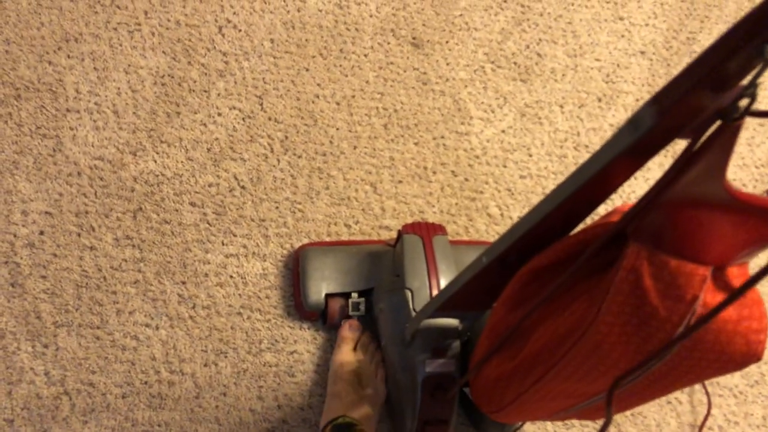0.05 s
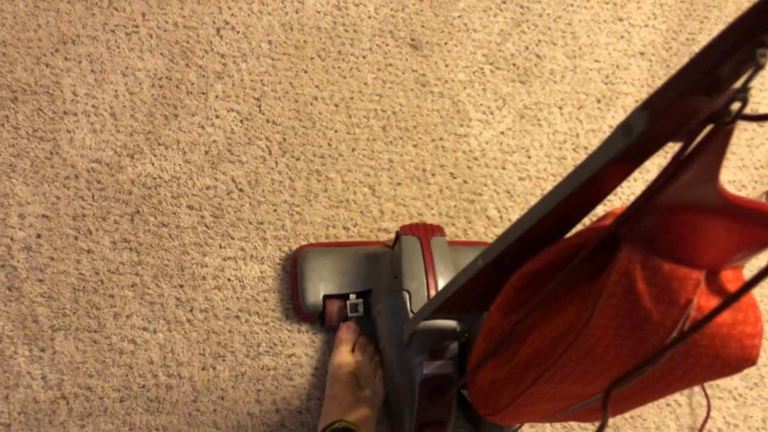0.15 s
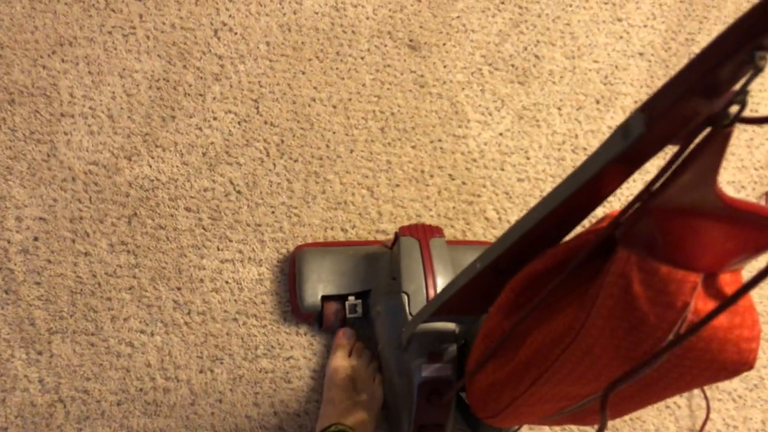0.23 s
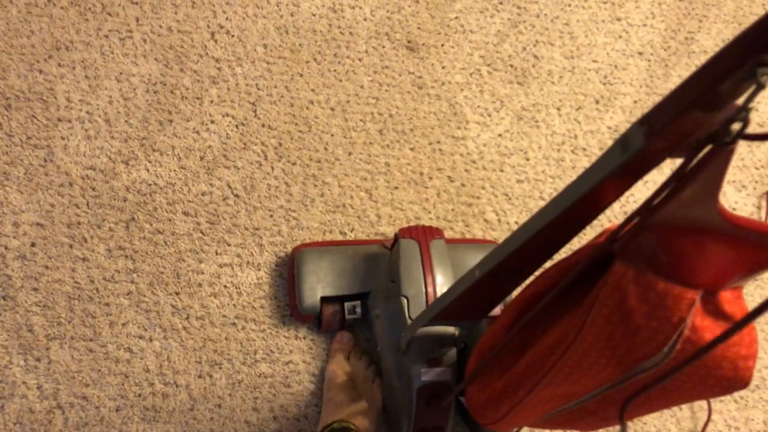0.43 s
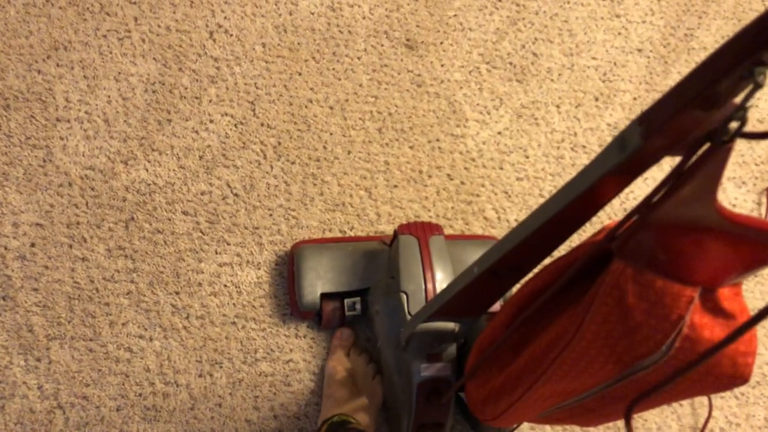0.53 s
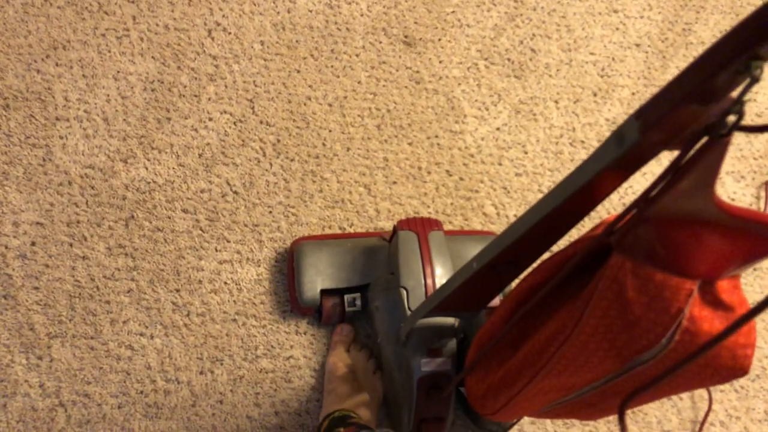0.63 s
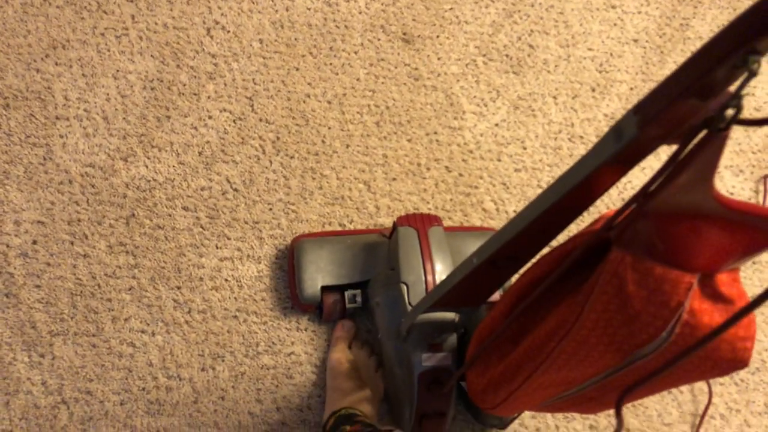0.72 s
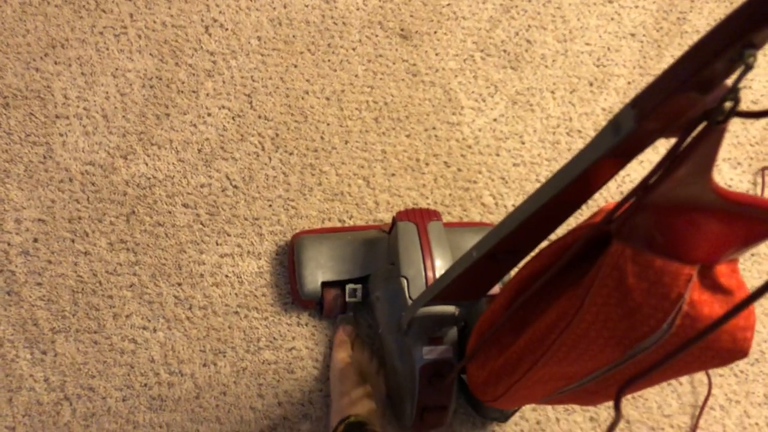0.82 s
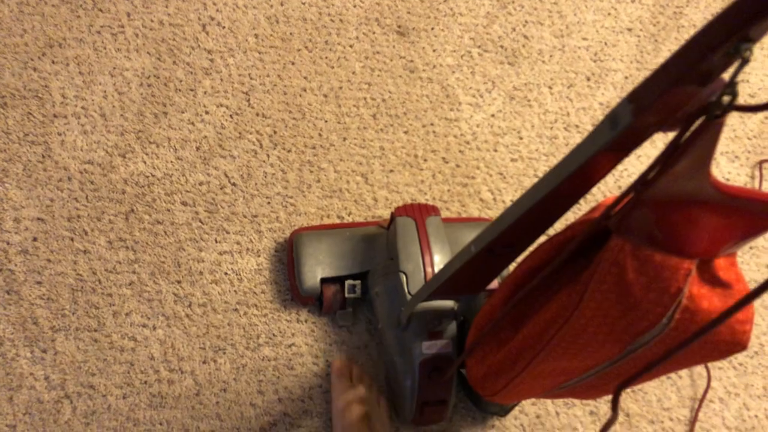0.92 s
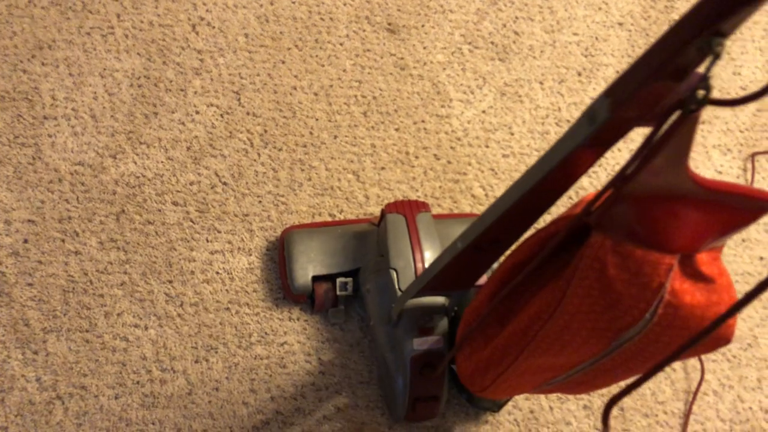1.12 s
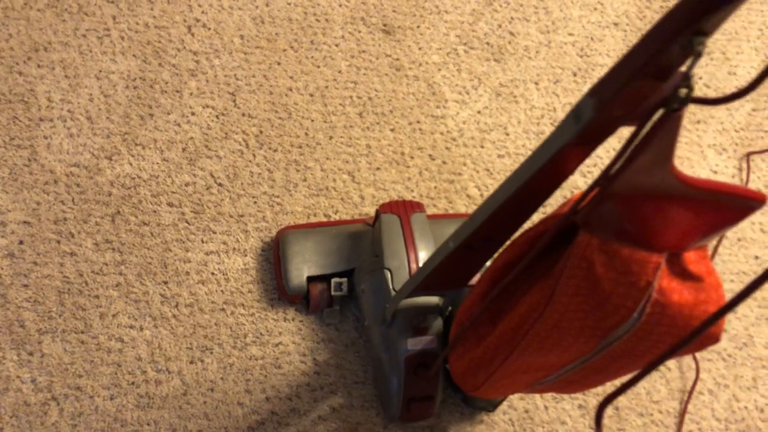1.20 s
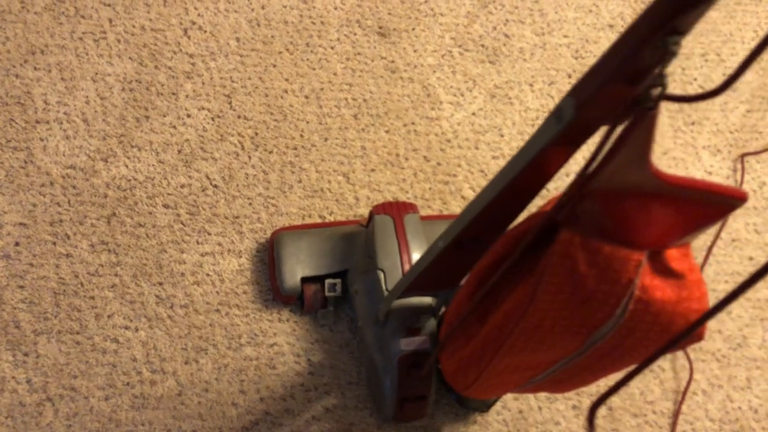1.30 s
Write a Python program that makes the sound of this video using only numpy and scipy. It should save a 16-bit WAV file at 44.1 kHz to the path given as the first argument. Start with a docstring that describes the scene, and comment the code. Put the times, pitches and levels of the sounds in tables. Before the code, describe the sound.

An upright vacuum cleaner's pedal snaps in a quick ratcheting crack, then releases with a clack.

```python
"""Faint rubbing and squeaks: a foot settles on an upright vacuum cleaner's pedal, motor off.
The pedal snaps over four catches; each crack rings the housing and the machine thuds on the floor.
The foot lets go with a hollow clack, then loose parts tick and something rubs softly.
Cracks are bursts of contact chatter; housing, hood and floor are damped modes. Quiet carpeted room."""
import sys
import numpy as np
from scipy import signal
from scipy.fft import rfft, irfft
from scipy.io import wavfile
from scipy.ndimage import uniform_filter1d

SR = 44100
rng = np.random.default_rng(int(sys.argv[2]) if len(sys.argv) > 2 else 0)


def to_wav(s):
    """Save 16-bit WAV."""
    ch = np.atleast_2d(s).T  # columns
    pcm = np.round(np.clip(ch, -1, 1) * 32767)  # PCM
    wavfile.write(sys.argv[1], SR, pcm.astype(np.int16))


N = 59535

# room background spectrum: f/Hz, level/dB
AIR_SPECTRUM = [(25, -28), (60, 0), (130, -0.5), (300, 1.5), (600, -11.5), (2000, -15.5), (4000, -27.5),
                (8000, -34.5), (16000, -42.5)]
# reverb bands: f/Hz, level/dB, t60/s
REVERB_BANDS = [(100, 0, .5), (300, 1, .48), (790, 0.5, .38), (1800, -7, 0.39), (4000, -5, 0.37),
                (8000, -6, 0.34), (12000, -4.5, .27), (16200, -10, .16)]
# early reflections: delay/s, level/dB
REFLECTIONS = [(.0052, -14), (.0130, -15)]
# rubbing envelope: t/s, level/dB
RUB_ENVELOPE = [(0, -58.5), (0.068, -61.5), (.15, -66), (.21, -64), (.7, -82.5), (.9, -73), (0.999, -62.5),
                (1.1, -68.5), (1.2, -78), (1.3, -58), (1.35, -53.5)]
# rubbing spectrum: f/Hz, level/dB
RUB_SPECTRUM = [(40, -20.5), (200, -7), (800, -5.5), (1600, -0.5), (2600, -2.5), (3600, -8.5), (7000, -19),
                (16000, -27.5)]
# scrape path: t/s, level/dB, f/Hz
SCRAPE_TRACK = [(0.969, -70, 2000), (1.0, -60.5, 2200), (1.06, -63.5, 2480), (1.13, -70, 2560),
                (1.2, -77, 2400)]
# squeaks under the foot: t/s, level/dB
SQUEAK_EVENTS = [(0.012, -60.5), (0.076, -61.5), (0.114, -64), (0.163, -63), (0.178, -61)]
# thuds on the carpet: t/s, level/dB
THUD_EVENTS = [(0.227, -42.5), (0.261, -34), (0.283, -34), (0.306, -34.5), (0.345, -39), (0.385, -44.5),
               (0.433, -58), (0.785, -46.5), (0.813, -48.5)]
# machine and floor modes: f/Hz, level/dB, t60/s
FLOOR_MODES = [(54, -18, .22), (86, -14, .15), (132.1, 1, 0.13), (148, -3.5, 0.11), (183.4, -0.5, .18),
               (247.7, -0.5, 0.073), (295.2, -4.5, 0.39)]
# knocks of pedal and loose parts: t/s, level/dB, contact/s, tilt/(dB/oct), accent/Hz
KNOCK_EVENTS = [(0.0632, -48.5, 0.0051, -6.5, 1410), (0.2213, -41.5, .004, -4.5, 1840),
                (0.7678, -35, .0025, -1.5, 2390), (0.777, -29.5, 0.0032, .3, 4400),
                (0.7916, -47.5, 0.0059, 6, 9940), (0.8162, -37.5, 0.005, -4, 613),
                (0.8212, -36.5, 0.0031, -0.5, 1670), (0.9656, -44, 0.0058, -1.5, 1930),
                (1.3120, -48.5, 0.008, -4, 1108), (1.317, -37.5, 0.0048, -2.5, 2000),
                (1.326, -47, .004, 1, 11000), (1.3445, -40, 0.008, 1, 4100)]
# knock spectrum: f/Hz, level/dB
KNOCK_SPECTRUM = [(45, -35.5), (180, -19.5), (500, -11.5), (1050, 0), (2100, -3), (3100, -9), (4400, -11),
                  (8000, -17), (16000, -30)]
# hood clacks: t/s, level/dB
CLACK_EVENTS = [(0.7810, -25.5), (0.8135, -50), (1.32, -53.5)]
# hollow pedal and hood modes: f/Hz, level/dB, t60/s
HOOD_MODES = [(317, -8.5, 0.038), (592, -8.5, 0.066), (733.4, -9.5, 0.15), (867, -4.5, 0.045),
              (945, 1.5, 0.041), (1071, -7, 0.043), (1596, -1, 0.038)]
# housing modes: f/Hz, level/dB, t60/s
HOUSING_MODES = [(430, -9, 0.26), (1090, -4.5, .06), (1400, -6.5, .07), (1464, -3, 0.09), (1600, -2.5, 0.3),
                 (1657, -0.5, 0.077), (1811, 2, .09), (2065, -4.5, .12), (2103, -6, .12),
                 (2263, 2.5, 0.068), (2602, -0.5, 0.096), (4200, -10, 0.099), (4680, -12.5, 0.087),
                 (5380, -7, 0.05)]
# pedal snaps: t/s, level/dB, contact/s, tilt/(dB/oct), accent/Hz
SNAP_EVENTS = [(0.2268, -12.5, .0032, -0.8, 1850), (0.2575, -14.5, 0.0023, 0.7, 8900),
               (0.2803, -11.5, 0.0032, -0.1, 5400), (0.3011, -11.5, 0.0017, 0.27, 2160)]
# snap spectrum: f/Hz, level/dB
SNAP_SPECTRUM = [(40, -37), (150, -29.5), (450, -11.5), (750, -11), (1400, -1.5), (2700, -5.5), (3100, -9),
                 (3500, -13), (4200, -4.5), (6200, -11), (8500, -6.5), (11500, -15), (16000, -20)]
# pedal resonances: f/Hz, width/Hz, level/dB
PEDAL_RESONANCES = [(2194, 117, -6.5), (2600, 180, -2), (5490, 80, -1.5), (6770, 180, -4.5),
                    (9200, 190, -17), (12500, 460, 0.5), (14300, 260, 4.5)]


def undb(db):
    return 10 ** (np.asarray(db) / 20)


def unit_rms(x):
    return x / np.sqrt(np.mean(x ** 2))


def since(start_s):
    """Seconds since start_s, zero before."""
    return np.maximum(np.arange(N) / SR - start_s, 0)


def jitter(samples):
    """Unit-RMS noise, smoothed by a moving average."""
    return unit_rms(uniform_filter1d(rng.standard_normal(N), size=samples))


def colour(x, spectrum, tilt_db_oct=0):
    """Minimum-phase filter; keeps the power of white noise."""
    hz, db = np.array(spectrum).T
    octave = np.log2(np.maximum(np.arange(N + 1) * SR / (2 * N), 1))
    tilt_db = tilt_db_oct * np.maximum(octave - np.log2(hz[0]), 0)
    gain = unit_rms(undb(np.interp(octave, np.log2(hz), db) + tilt_db))
    cepstrum = irfft(np.log(gain))[:N]
    cepstrum[0] /= 2
    return irfft(rfft(x, 2 * N) * np.exp(rfft(2 * cepstrum, 2 * N)))[:N]


def bandpass(x, hz, q):
    return signal.lfilter(*signal.iirpeak(hz, q, fs=SR), x)


def ring(start_s, modes, rise_s, detune=0.0021):
    """Damped modes after one blow, randomly detuned."""
    t, out = since(start_s), 0
    for hz, db, t60_s in modes:
        cycles = hz * (1 + detune * rng.standard_normal()) * t + rng.random()
        out += undb(db) * np.sin(2 * np.pi * cycles) * np.exp(-np.log(1000) * t / t60_s)
    return out * (1 - np.exp(-t / rise_s))


def contact(start_s, contact_s, rise_s=0.00063, sag_s=0.0075, fall_s=0.0022):
    """Milliseconds of flat-spectrum chatter between two hard parts."""
    t, t_after = since(start_s), since(start_s + contact_s)
    attack = np.minimum(t / rise_s, 1)
    envelope = attack * np.exp(-t / sag_s - t_after / fall_s)
    chatter = rng.standard_normal(N)
    for _ in range(2):  # impose envelope, then whiten
        phase = np.angle(rfft(envelope * np.sign(chatter)))
        chatter = irfft(np.exp(1j * phase), N)
    return chatter * attack * np.exp(-t_after / sag_s) * np.linalg.norm(envelope)


def impacts(events, spectrum, accent_db, accent_q=3.2):
    """Coloured chatter bursts; each contact point favours one band."""
    out = 0
    for start_s, db, contact_s, tilt_db_oct, accent_hz in events:
        burst = colour(contact(start_s, contact_s), spectrum, tilt_db_oct)
        out += undb(db) * (burst + undb(accent_db) * bandpass(burst, accent_hz, accent_q))
    return out


def air(level_db=-59):
    """Steady low room noise."""
    return undb(level_db) * unit_rms(colour(rng.standard_normal(N), AIR_SPECTRUM))


def room(x, delay_s=0.0043, build_s=0.0013):
    """Two near reflections and a short diffuse tail; treble dies first."""
    t, response = since(delay_s), np.zeros(N)
    octave = np.log2(np.maximum(np.arange(N // 2 + 1) * SR / N, 1))
    noise = rfft(rng.standard_normal(N))
    centres = np.log2([hz for hz, *_ in REVERB_BANDS])
    for weights, (_, db, t60_s) in zip(np.eye(len(REVERB_BANDS)), REVERB_BANDS):
        band = irfft(noise * np.interp(octave, centres, weights), N)
        envelope = (1 - np.exp(-t / build_s)) * np.exp(-np.log(1000) * t / t60_s)
        response += undb(db) * band * envelope / np.linalg.norm(envelope)
    for lag_s, db in REFLECTIONS:
        response[int(lag_s * SR)] += undb(db)
    return signal.fftconvolve(x, response)[:N]


def rubbing(grain_db=3):
    """Grainy friction, as of the foot and cloth bag shifting."""
    times_s, db = np.array(RUB_ENVELOPE).T
    friction = undb(grain_db * jitter(150)) * rng.standard_normal(N)
    return undb(np.interp(since(0), times_s, db)) * unit_rms(colour(friction, RUB_SPECTRUM))


def scrape(width_hz=530):
    """Faint noise band, rising in pitch as the foot draws away."""
    times_s, db, hz = np.array(SCRAPE_TRACK).T
    lowpass = signal.butter(2, width_hz / 2, fs=SR)
    grain = signal.lfilter(*lowpass, rng.standard_normal(N) + 1j * rng.standard_normal(N))
    cycles = np.cumsum(np.interp(since(0), times_s, hz)) / SR
    envelope = np.interp(since(0), times_s, undb(db), left=0, right=0)
    return envelope * unit_rms(np.real(grain * np.exp(2j * np.pi * cycles)))


def squeaks(start_hz=12600, fall_hz_per_s=79000, wobble_hz=350, peak_s=0.0028):
    """Tiny ragged falling chirps as the foot settles."""
    out = 0
    for start_s, db in SQUEAK_EVENTS:
        t = since(start_s)
        hz = start_hz - fall_hz_per_s * t + wobble_hz * jitter(30)
        envelope = t / peak_s * np.exp(1 - t / peak_s)
        out += undb(db) * envelope * np.sin(2 * np.pi * np.cumsum(hz) / SR)
    return out


def thuds():
    """The machine's weight bumps and rocks on the carpeted floor."""
    return sum(undb(db) * ring(s, FLOOR_MODES, rise_s=0.0024, detune=0.025) for s, db in THUD_EVENTS)


def knocks():
    """Lighter, duller contacts of pedal and loose parts."""
    return impacts(KNOCK_EVENTS, KNOCK_SPECTRUM, accent_db=4)


def hood():
    """Clacks ring the hollow hood."""
    return sum(undb(db) * ring(s, HOOD_MODES, rise_s=0.00095) for s, db in CLACK_EVENTS)


def housing(snap_db=-28.5, knock_coupling_db=-16):
    """Snaps ring the housing fully, knocks lightly."""
    blows = [(s, snap_db) for s, *_ in SNAP_EVENTS]
    blows += [(s, db + knock_coupling_db) for s, db, *_ in KNOCK_EVENTS]
    return sum(undb(db) * ring(s, HOUSING_MODES, rise_s=0.0015) for s, db in blows)


def pedal():
    """Four catches crack and excite the pedal's quickly damped resonances."""
    cracks = impacts(SNAP_EVENTS, SNAP_SPECTRUM, accent_db=-3)
    return cracks + sum(undb(db) * bandpass(cracks, hz, hz / width_hz)
                        for hz, width_hz, db in PEDAL_RESONANCES)


def scene(shell_send_db=-4.5):
    """Mono mix; the low-lying shell feeds the room less than the clicks do."""
    clicks = pedal() + knocks()
    shell = housing() + hood()
    foot = rubbing() + scrape() + squeaks()
    background = air()
    reverb = room(clicks + undb(shell_send_db) * shell)
    return (background + reverb + foot + thuds() + shell + clicks)[None]


def record(dry, ceiling=0.9, cutoff_hz=15900):
    """Soft peak limit, then steep low-pass."""
    lowpass = signal.ellip(8, 0.2, 70, cutoff_hz, fs=SR, output="sos")
    return signal.sosfilt(lowpass, ceiling * np.tanh(dry / ceiling))


dry = scene()
out = record(dry)
to_wav(out)
```